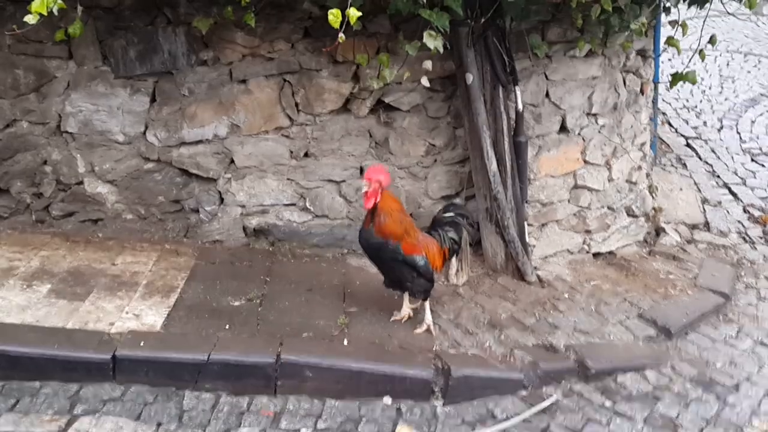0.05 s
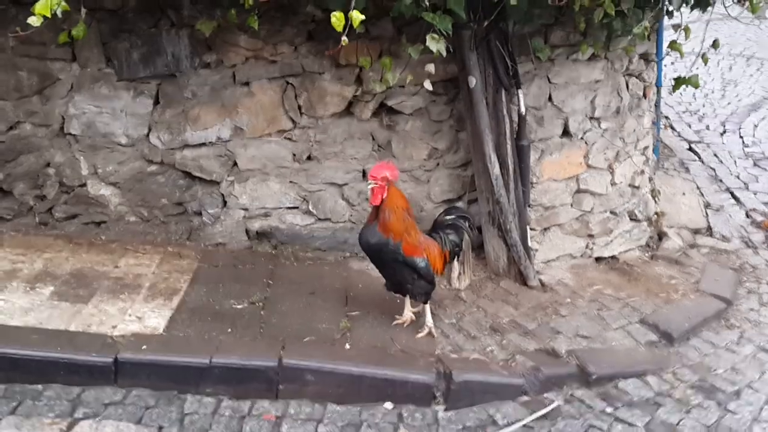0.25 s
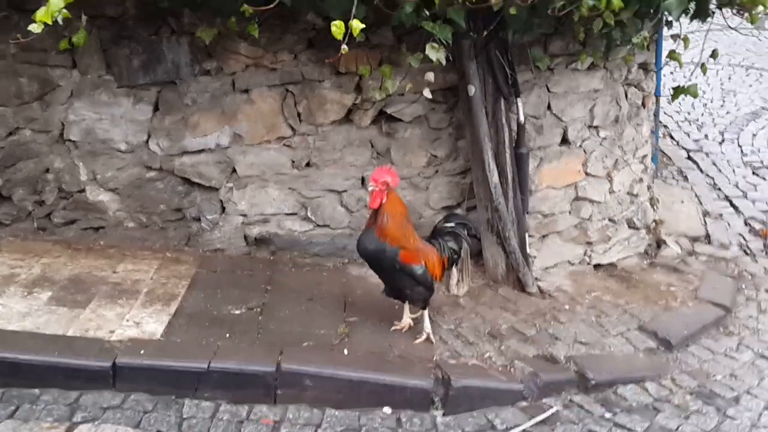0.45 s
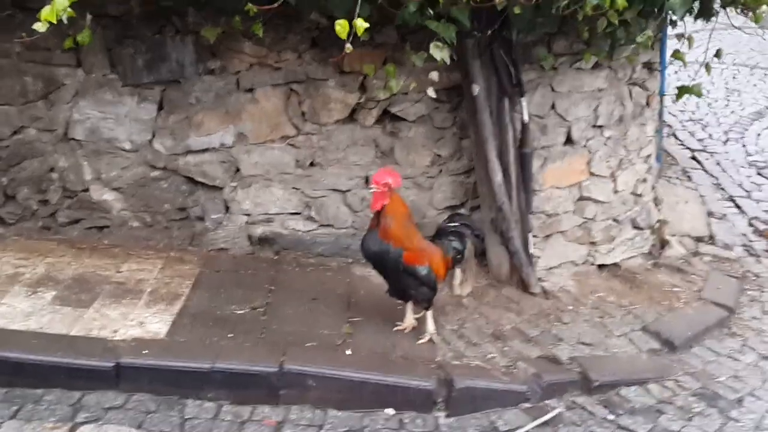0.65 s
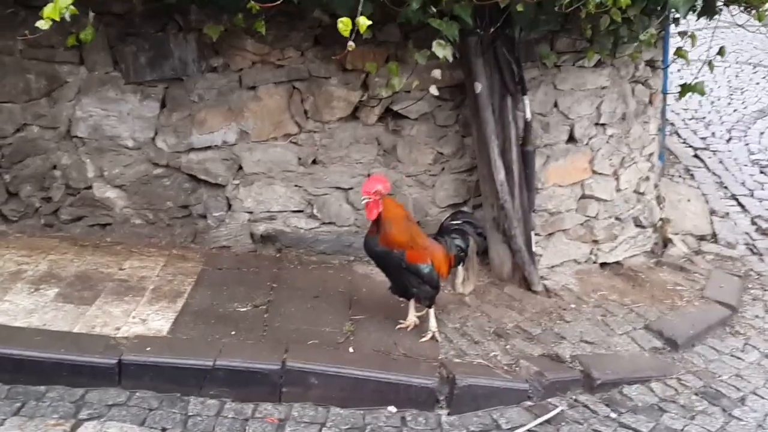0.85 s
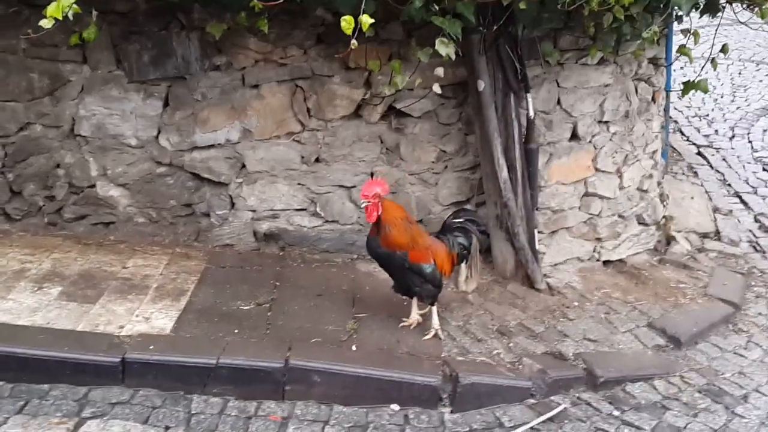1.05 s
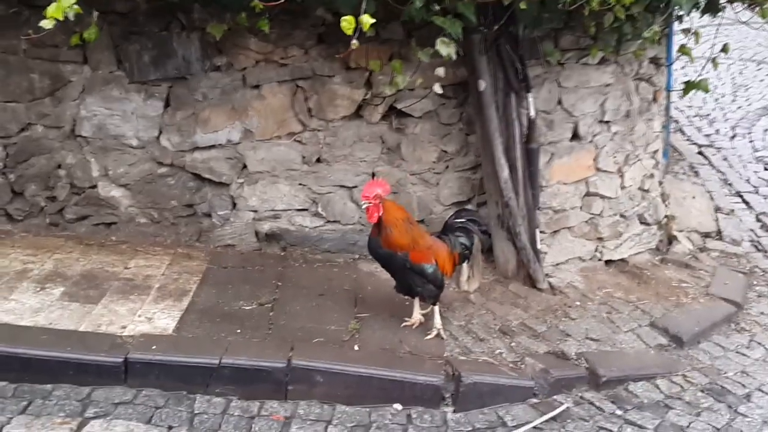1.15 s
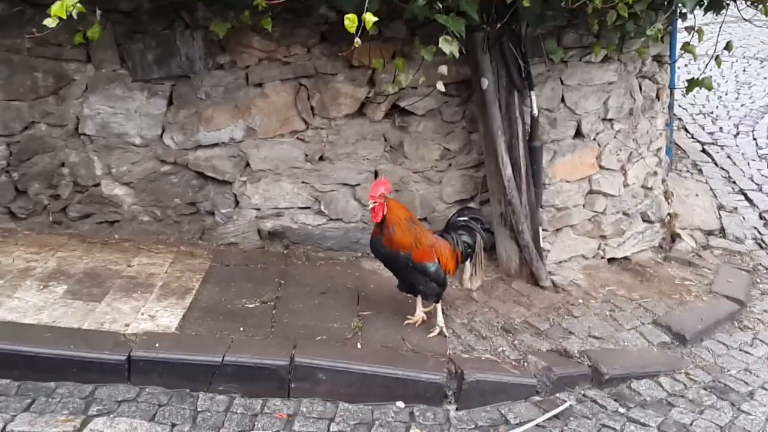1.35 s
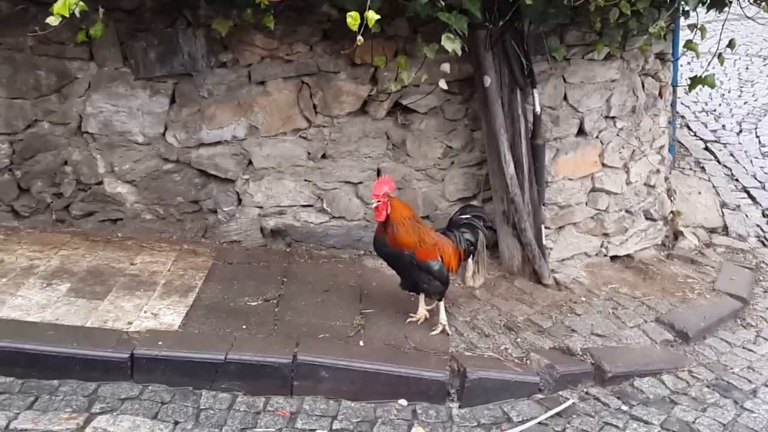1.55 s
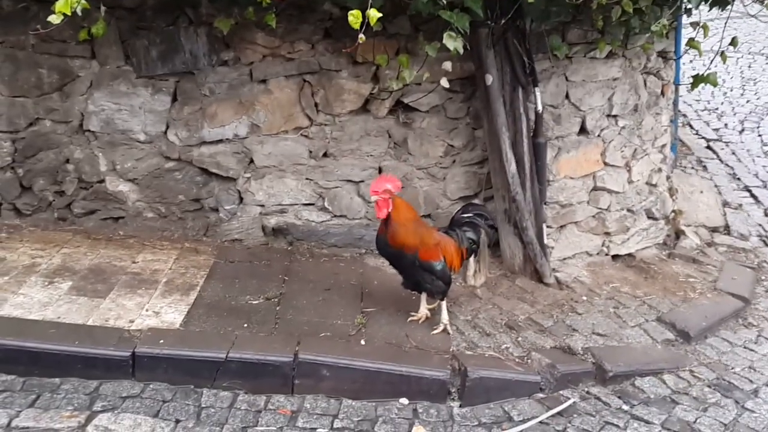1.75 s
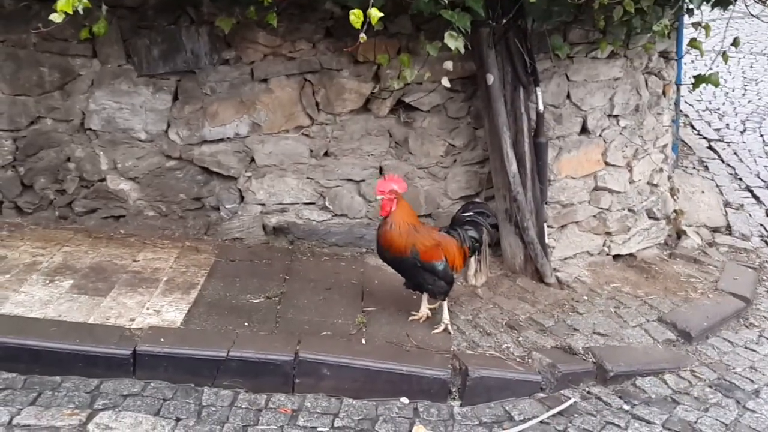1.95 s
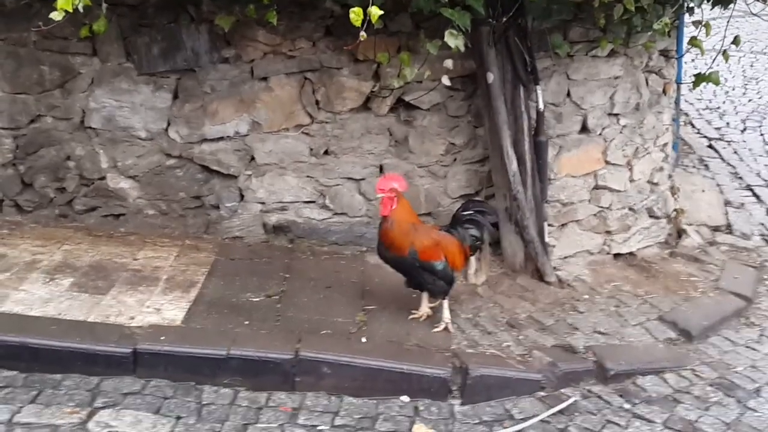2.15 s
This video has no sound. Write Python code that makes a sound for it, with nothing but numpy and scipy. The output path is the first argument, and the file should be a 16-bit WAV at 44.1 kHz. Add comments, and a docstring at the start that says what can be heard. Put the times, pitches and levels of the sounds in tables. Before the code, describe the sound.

A rooster crows once outdoors, near and loud. After near silence, a short opening note starts at 0.16 s, rises and dips, then leaps cleanly up around 0.45 s. A long, harsh, buzzing hold follows, growling at first and increasingly ragged, falling off by 1.95 s. Faint stone-wall and street reflections trail over low distant rumble; a tiny dry click comes at 2.03 s. Peaks sound squeezed.

```python
"""Pavement before a stone wall: a rooster crows once; a short opening note, a clean leap up, a long harsh hold.
Two syrinx membranes sing as sine partials; irregular closure pulses and air puffs ring a changing throat.
Wall, street and a far house front return faint filtered-noise reflections over a low rumble.
One small noise tick follows; a fast limiter holds the peaks."""
import sys
import numpy as np
from scipy import signal
from scipy.fft import rfft, irfft
from scipy.io import wavfile
from scipy.ndimage import uniform_filter1d, minimum_filter1d

SR = 44100
rng = np.random.default_rng(int(sys.argv[2]) if len(sys.argv) > 2 else 0)


def unload_wav(signal):
    """Save mono or channel-first audio to the path in sys.argv[1] as 16-bit WAV at rate SR, clipped to [-1, 1]."""
    wavfile.write(
        sys.argv[1],
        SR,
        np.round(np.clip(np.atleast_2d(signal).T, -1, 1) * 32767).astype(np.int16),
    )


N = 97020

# first membrane: (time [s], pitch [Hz])
FIRST_PITCH = [(.16, 540), (.19, 560), (.203, 720), (.228, 792), (.30, 810), (.335, 815), (.355, 650),
               (.395, 660), (.43, 600), (.445, 700), (.463, 852), (.487, 865), (.52, 848), (.555, 842),
               (.58, 814), (.65, 835), (.73, 823), (.83, 843), (.96, 832), (1.2, 856), (1.72, 855),
               (1.83, 765), (1.912, 738), (1.93, 555), (1.97, 550)]
# second membrane, heard by its octave in the main throat resonance: (time [s], frequency [Hz], level [dB])
SECOND_OCTAVE = [(.53, 1376, -35), (.57, 1366, -22), (.72, 1378, -23), (.86, 1351, -19), (.96, 1310, -26),
                 (1.03, 1351, -14), (1.11, 1370, -22), (1.18, 1427, -18), (1.265, 1430, -19.5),
                 (1.3, 1448, -14), (1.45, 1446, -14.5), (1.54, 1455, -11.5), (1.698, 1473, -12),
                 (1.709, 1455, -45), (1.728, 1458, -13), (1.80, 1431, -15.5), (1.83, 1429, -27),
                 (1.86, 1451, -22.5), (1.892, 1455, -34), (1.917, 1452, -13.5), (1.94, 1456, -22),
                 (1.96, 1451, -47)]
# growl, the vibration repeating every third cycle: (time [s], level [dB])
GROWL_LEVEL = [(.51, -40), (.55, -19.5), (.62, -24), (.8, -28.5), (.95, -38), (1.1, -39)]
# unsteadiness of both membranes: (time [s], roughness [0-1])
ROUGHNESS = [(.16, 0.34), (.21, 0.1), (.26, 0.38), (.43, 0.67), (.465, 0.21), (.51, 0.18), (.55, 0.61),
             (1.0, 0.83), (1.35, 0.92), (1.6, 0.72), (1.9, .9)]
# throat changes from opening to wide, then from wide to late (start, end)
WIDEN_S, NARROW_S = (0.17, 0.53), (0.91, 1)


def undb(db):
    """Decibels to gain."""
    return 10 ** (np.asarray(db) / 20)


def unit(x):
    """Scale to rms 1."""
    return x / np.sqrt(np.mean(x ** 2))


def curve(rows, column=1):
    """One table column, joined by straight lines in time."""
    rows = np.array(rows, float)
    return np.interp(np.arange(N) / SR, rows[:, 0], rows[:, column])


def swell(rows, column=1):
    """Gain from a dB column, silent outside the table, with short edge fades."""
    t = np.arange(N) / SR
    inside = 1. * ((t > rows[0][0]) & (t < rows[-1][0]))
    return undb(curve(rows, column)) * uniform_filter1d(inside, size=128)


def walk(rate):
    """Smooth random signal of rms 1 with about `rate` turns a second."""
    hz = np.arange(N // 2 + 1) * SR / N
    spectrum = rfft(rng.standard_normal(N)) / (1 + (2 * hz / rate) ** 4)
    return unit(irfft(spectrum, N))


def colour(x, points):
    """Minimum-phase filter with the response (frequency [Hz], gain [dB])."""
    size = 4096
    hz, db = np.array(points, float).T
    grid_hz = np.maximum(np.arange(size // 2 + 1) * SR / size, 1)
    gain = undb(np.interp(np.log(grid_hz), np.log(hz), db))
    # folding the cepstrum makes the response causal
    cepstrum = irfft(np.log(gain))
    cepstrum[1:size // 2] *= 2
    cepstrum[size // 2 + 1:] = 0
    response = irfft(np.exp(rfft(cepstrum)))
    return signal.fftconvolve(x, response)[:len(x)]


def band(x, edge_hz, kind):
    """Steep low-, band- or high-pass."""
    return signal.sosfilt(signal.butter(6, edge_hz, kind, fs=SR, output="sos"), x)


def ring(x, hz, width_hz):
    """One resonance, gain 1 at its centre."""
    return signal.lfilter(*signal.iirpeak(hz, hz / width_hz, fs=SR), x)


def scatter(x, delay_s, t60_s):
    """Diffuse reflections: decaying noise of unit energy after a delay."""
    t = np.arange(N) / SR - delay_s
    decay = np.exp(-np.log(1000) * np.abs(t) / t60_s)
    response = rng.standard_normal(N) * (t > 0) * decay
    return signal.fftconvolve(x, response / np.linalg.norm(response))[:N]


def rumble():
    """Distant town noise: a source shared by both ears plus a separate part that is weak in the deep bass."""
    # (time [s], level before the offset [dB])
    level = [(0.0, -116), (0.1, -107), (0.15, -70), (0.35, -50.5), (0.58, -46), (0.97, -50), (1.73, -51.5),
             (2.0, -45.5), (2.2, -49.5)]
    # (frequency [Hz], gain [dB])
    spectrum = [(25, -18), (50, -7), (80, -2), (140, -2.5), (250, -6.5), (400, -11.5), (1000, -11.5),
                (3500, -25), (5000, -32.5), (15000, -49)]
    separate_colour = [(50, -29), (150, -25.5), (500, -7), (1500, 14.5)]
    offset_db = 6.5
    shared = rng.standard_normal(N)
    ears = []
    for _ in range(2):
        separate = colour(rng.standard_normal(N), separate_colour)
        ears.append(unit(colour(shared + separate, spectrum)))
    return np.array(ears) * undb(curve(level) + offset_db)


def slaps():
    """Uneven syrinx closures, each with an air puff; they follow the first membrane, then the second."""
    jitter_cycles, late_jitter_cycles, drift_cycles = .12, .13, .04
    scatter_db, third_db = 2.0, 2
    air_share, puff_decay_s = .3, 0.00057
    flutter_db, flutter_rate = 1.0, 260
    chance = rng.standard_normal((N // 20, 3))
    late = np.interp(np.arange(N) / SR, NARROW_S, [0, 1])
    pitch_hz = (1 - late) * curve(FIRST_PITCH) + late * curve(SECOND_OCTAVE) / 2
    cycles = np.cumsum(pitch_hz) / SR
    number = np.arange(len(chance))
    # more ragged once the throat narrows
    jitter = jitter_cycles + late_jitter_cycles * np.interp(number, cycles, late)
    marks = number + np.cumsum(drift_cycles * chance[:, 0]) + jitter * chance[:, 2]
    keep = marks < cycles[-2]
    at = np.interp(marks[keep], cycles, np.arange(N)).astype(int)
    # every third closure is stronger in the growl
    growl_gain = swell(GROWL_LEVEL)
    growl = growl_gain[at] / growl_gain.max()
    third = np.cos(2 * np.pi * number[keep] / 3)
    size = undb(scatter_db * chance[keep, 1] + third_db * growl * third)
    # the steady part of the flow sings in the tones
    pulses = np.bincount(at, size - 0.32 * size.mean(), N)
    puff_pole = np.exp(-1 / (puff_decay_s * SR))
    puff_envelope = signal.lfilter([1], [1, -puff_pole], np.bincount(at, size, N))
    puffs = puff_envelope * rng.standard_normal(N)
    flow = unit(pulses - pulses.mean()) + air_share * unit(puffs)
    return flow * undb(flutter_db * walk(flutter_rate))


def rasp():
    """Closures ring the changing throat; bass, middle and treble each follow their own level."""
    # throat responses: (frequency [Hz], gain [dB])
    opening_shape = [(180, -55), (300, -10), (348, -25), (424, -10), (492, -7), (652, 4.5), (708, -14.5),
                     (821, 2.5), (907, -11), (1220, 3), (1810, 2), (2000, 0.5), (2210, -32), (2650, -15.5),
                     (3020, -56), (3510, -36.5), (3940, -12), (4960, 2), (5480, -6), (6360, -16),
                     (7750, -30), (8990, -20), (12300, -28), (14800, -27), (15500, -172)]
    wide_shape = [(180, -100), (300, -31.5), (415, -33), (547, -5.5), (732, -8), (820, -9), (934, -28),
                  (1060, -5.5), (1360, 0.5), (1470, -3), (1620, -6), (1880, 1), (2040, -20.5), (2510, -28),
                  (3210, -74), (3530, -29.5), (4020, -25), (4890, -5.5), (5480, -21), (6140, -6.5),
                  (6650, -25), (9060, -27), (9820, -29.5), (11700, -36), (14500, -45)]
    late_shape = [(180, -124), (300, -54), (389, -41), (593, -19), (709, -29), (834, -12.5), (1050, -35.5),
                  (1120, -18), (1450, -2.5), (1570, -16.5), (1760, -15), (2140, -32.5), (2390, -43),
                  (2680, -19.5), (2960, -45), (3480, -38), (3710, -24), (4160, -27), (4730, -15.5),
                  (5840, -26), (6440, -40.5), (8490, -40.5), (9210, -38), (11200, -40), (14500, -50)]
    # sharp upper resonances: (wide centre [Hz], late centre [Hz], width [Hz], boost [gain])
    rings = [(5050, 4790, 200, .8), (6270, 5180, 110, 1.1), (9050, 9350, 260, .8)]
    # (time [s], bass [dB], middle [dB], treble [dB])
    levels = [(.157, -62, -74, -70), (.161, -45, -32.5, -41), (.21, -43, -33, -35),
              (.24, -38.5, -26.5, -29.5), (.29, -29, -20, -26), (.345, -30, -17.5, -24),
              (.38, -25.5, -28, -32), (.428, -40, -31.5, -43), (.45, -26, -14, -20),
              (.475, -31, -50, -35.5), (.51, -39, -18.5, -18), (.54, -23.5, -15.5, -24.5),
              (.6, -26.5, -15.5, -24.5), (.83, -31.5, -19, -23), (1.0, -31.5, -20.5, -22),
              (1.28, -31.5, -16, -20), (1.6, -33, -18, -23), (1.8, -34.5, -16, -24),
              (1.9, -31.5, -16.5, -21), (1.925, -34, -22, -31), (1.955, -46, -35, -37.5)]
    bass_edge_hz, treble_edge_hz = 892, 2886
    source = slaps()
    t = np.arange(N) / SR
    wide = np.interp(t, WIDEN_S, [0, 1])
    late = np.interp(t, NARROW_S, [0, 1])
    throat = (1 - wide) * unit(colour(source, opening_shape))
    throat += (wide - late) * unit(colour(source, wide_shape))
    throat += late * unit(colour(source, late_shape))
    voice = throat.copy()
    for wide_hz, late_hz, width_hz, boost in rings:
        voice += boost * (1 - late) * ring(throat, wide_hz, width_hz)
        voice += boost * late * ring(throat, late_hz, width_hz)
    parts = [band(voice, bass_edge_hz, "low"),
             band(voice, [bass_edge_hz, treble_edge_hz], "band"),
             band(voice, treble_edge_hz, "high")]
    total = np.zeros(N)
    for column, part in enumerate(parts, start=1):
        local_rms = np.sqrt(uniform_filter1d(part ** 2, size=2600))
        total += part / local_rms * swell(levels, column)
    return total


def vibration(hz):
    """Membrane phase: pitch wanders and cycles slip, both in proportion to roughness."""
    wander_share, wander_rate = 0.00603, 73.2
    slip_rad, slip_rate = .3, 242
    rough = curve(ROUGHNESS)
    wandering_hz = hz * (1 + wander_share * rough * walk(wander_rate))
    return 2 * np.pi * np.cumsum(wandering_hz) / SR + slip_rad * rough * walk(slip_rate)


def partial(phase):
    """One voice line, its amplitude trembling with roughness at constant mean power."""
    shimmer_db, shimmer_rate = 3.0, 113
    depth = (undb(shimmer_db) - 1) * curve(ROUGHNESS)
    tremble = (1 + depth * walk(shimmer_rate)) / np.hypot(1, depth)
    return np.sqrt(2) * np.sin(phase) * tremble


def tones():
    """Pitched part of the crow: two membranes and growl lines at thirds of the first pitch."""
    # (time [s], fundamental [dB], octave [dB], overtones [dB])
    levels = [(.16, -50, -61, -77), (.19, -34.5, -42, -69), (.21, -36, -18, -53), (.235, -33.5, -26, -39.5),
              (.33, -35.5, -34, -46), (.36, -22, -41, -66), (.428, -47, -52, -64), (.445, -14, -18, -47.5),
              (.468, -23, -8.5, -32), (.51, -15.5, -9, -31), (.54, -17, -15, -27), (.59, -26.5, -21.5, -38),
              (.85, -24, -19.5, -35.5), (1.0, -34.5, -22, -35.5), (1.25, -37, -18.5, -44.5),
              (1.7, -49, -31, -41), (1.83, -36.5, -46, -37), (1.912, -27, -36, -39), (1.94, -28, -37, -56),
              (1.965, -32, -56, -65)]
    # (multiple of pitch, relative level [dB])
    overtones = [(3, -18.5), (4, -21.5), (5, -3.5), (6, 1), (7, 0.5), (8, -11), (9, -17), (11, -11),
                 (13, -14), (14, -8)]
    # (thirds of pitch, relative level [dB])
    thirds = [(2, -14), (4, -4), (7, -6.5)]
    stutter_share, stutter_rate = .25, 60
    phase = vibration(curve(FIRST_PITCH))
    fundamental = swell(levels, 1) * partial(phase)
    octave = swell(levels, 2) * partial(2 * phase)
    upper = swell(levels, 3) * sum(undb(db) * partial(k * phase) for k, db in overtones)
    growl = swell(GROWL_LEVEL) * sum(undb(db) * partial(k * phase / 3) for k, db in thirds)
    # the second membrane keeps catching
    stutter = np.minimum(1 + stutter_share * walk(stutter_rate), 1.2)
    second = swell(SECOND_OCTAVE, 2) * partial(vibration(curve(SECOND_OCTAVE))) * stutter
    return fundamental + octave + upper + growl + second


def ear(x, side):
    """Level and phase of the direct sound at the left (+1) or right (-1) ear."""
    # (frequency [Hz], left minus right [dB])
    level_difference = [(60, -36), (110, -36), (200, -62), (380, -3), (700, -1.5), (1290, -6.5),
                        (2380, -4.5), (4400, -1.5), (8120, -7), (15000, -3)]
    # (frequency [Hz], lead of the left ear [rad])
    phase_lead = [(400, 0), (1400, 0.6), (2600, 0.87), (4000, 0.98), (4800, -1.13), (6000, -0.11),
                  (15000, 1.9)]
    log_hz = np.log(np.maximum(np.arange(N + 1) * SR / (2 * N), 1))
    level_hz, level_db = np.array(level_difference).T
    lead_hz, lead_rad = np.array(phase_lead).T
    db = np.interp(log_hz, np.log(level_hz), level_db)
    lead = np.interp(log_hz, np.log(lead_hz), lead_rad)
    gain = 2 * undb(side * db / 2) / (undb(db / 2) + undb(-db / 2))
    return irfft(rfft(x, 2 * N) * gain * np.exp(.5j * side * lead))[:N]


def street(crow, side):
    """Crow at one ear: direct, off the near wall, along the street and back from a far house front."""
    # reflection colours: (frequency [Hz], gain [dB]); the rough wall scatters more treble than bass
    wall_colour = [(500, -11), (1600, -14), (2500, -5), (5000, -6), (8000, -1), (15000, 0)]
    tail_colour = [(300, 3), (550, 6), (1000, 4), (1500, -1), (3000, 6), (4800, -9), (9000, -9),
                   (15000, -12)]
    echo_colour = [(300, -1), (540, 10), (800, 5), (1100, -15), (1500, -3), (3000, -21), (5000, -32),
                   (15000, -28)]
    tail_db, echo_db = -25, -30
    direct = ear(crow, side)
    wall = scatter(colour(direct, wall_colour), delay_s=0.0045, t60_s=.085)
    tail = scatter(colour(crow, tail_colour), delay_s=0.022, t60_s=1.0)
    echo = scatter(colour(crow, echo_colour), delay_s=.2, t60_s=.02)
    return direct + wall + undb(tail_db) * tail + undb(echo_db) * echo


def tick():
    """One tiny dry click close by: high-passed noise with a very fast decay."""
    start_s, level_db, decay_s = 2.028, -20, 0.0004
    t = np.arange(N) / SR - start_s
    envelope = (t > 0) * np.exp(-np.abs(t) / decay_s)
    return band(rng.standard_normal((2, N)), 3250, "high") * envelope * undb(level_db)


def scene():
    """The rooster a little to the right, in its street."""
    crow = tones() + rasp()
    ears = np.array([street(crow, side) for side in (1, -1)])
    return ears + rumble() + tick()


def record(dry):
    """A fast limiter turns both ears down together at peaks; the top is cut."""
    limit_db, window_s, top_hz = -2.2, 0.0069, 15000
    size = int(window_s * SR)
    peak = np.abs(dry).max(axis=0)
    gain = np.minimum(1, undb(limit_db) / (peak + 1e-9))
    held = dry * uniform_filter1d(minimum_filter1d(gain, size), size)
    return signal.sosfilt(signal.ellip(8, .2, 70, top_hz, fs=SR, output="sos"), held)


dry = scene()
out = record(dry)
unload_wav(out)
```